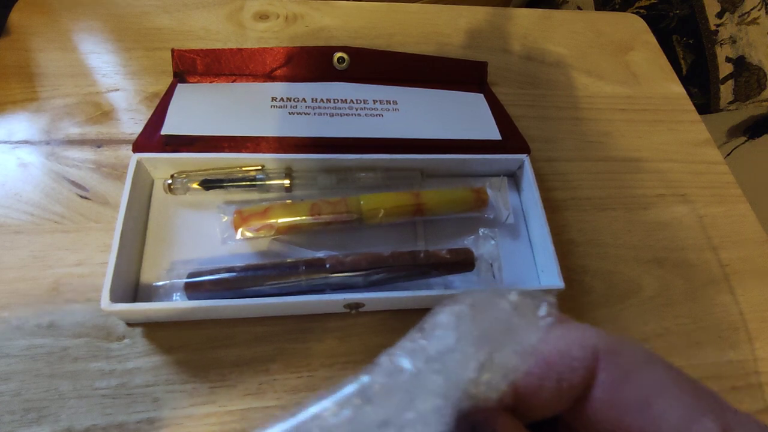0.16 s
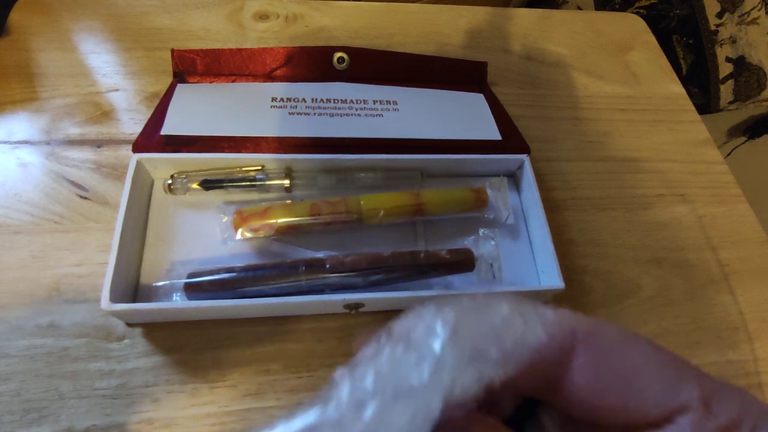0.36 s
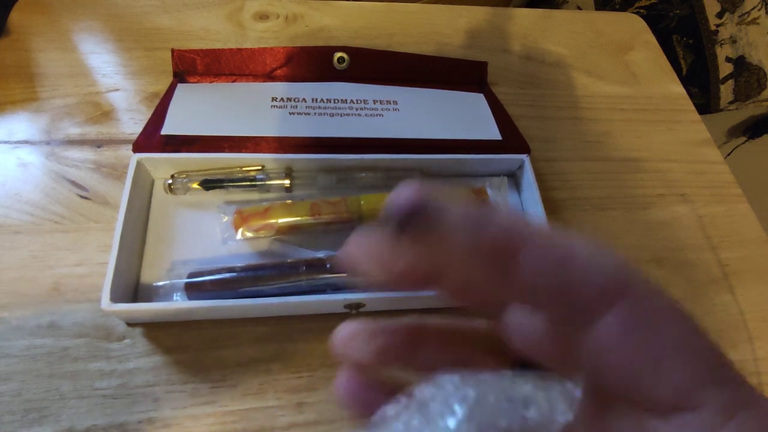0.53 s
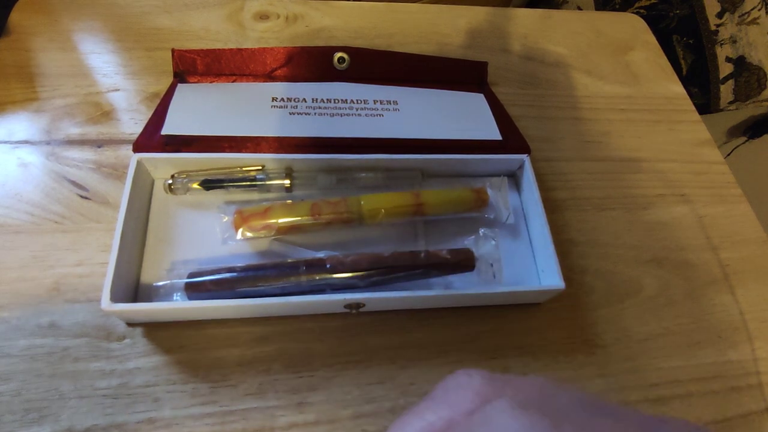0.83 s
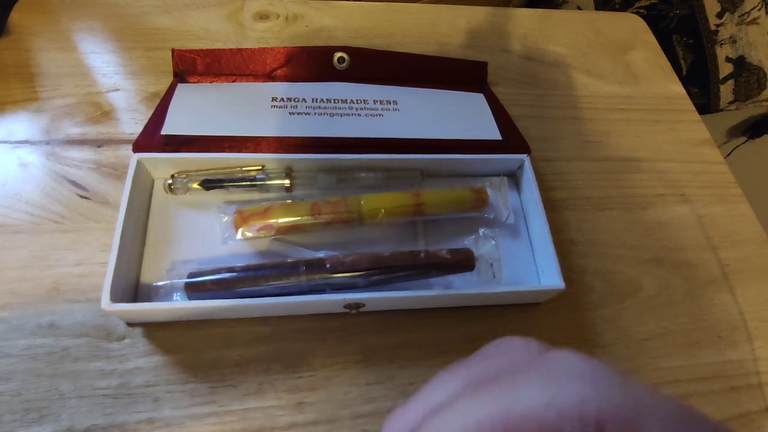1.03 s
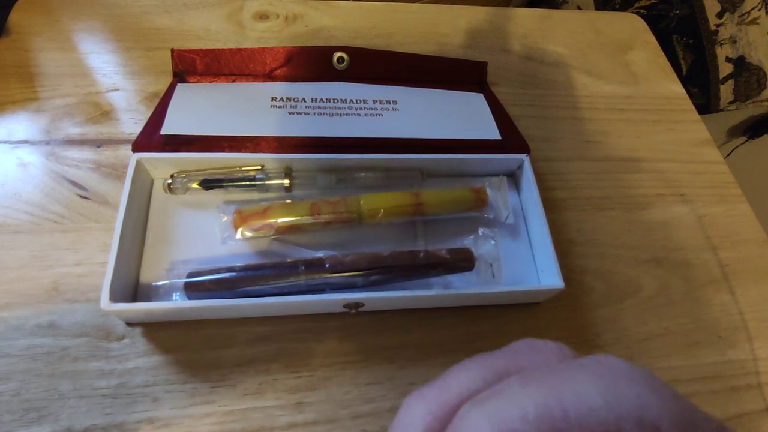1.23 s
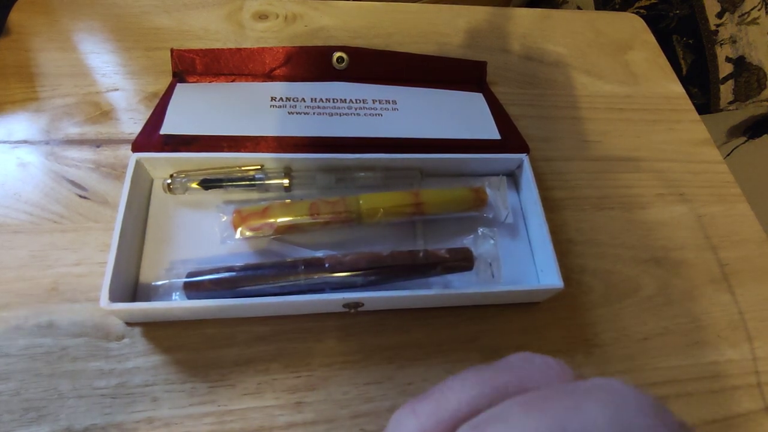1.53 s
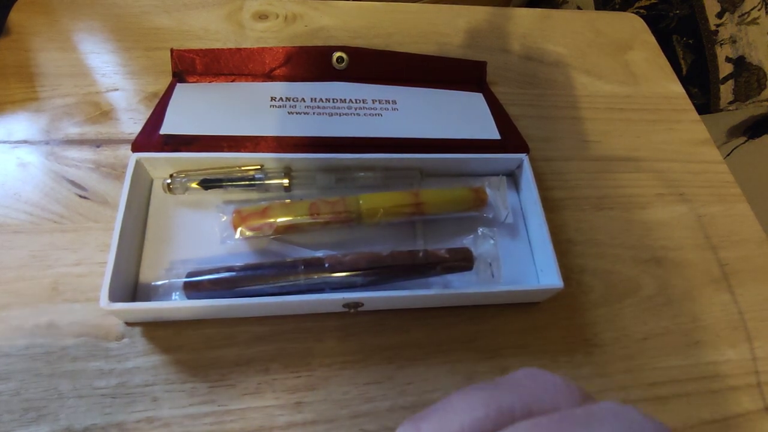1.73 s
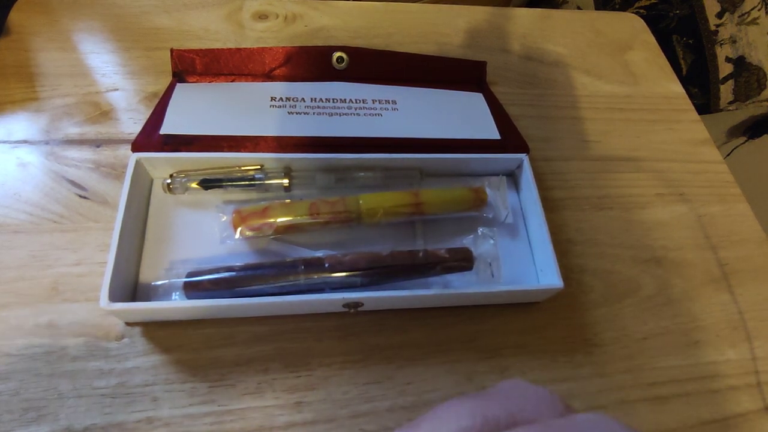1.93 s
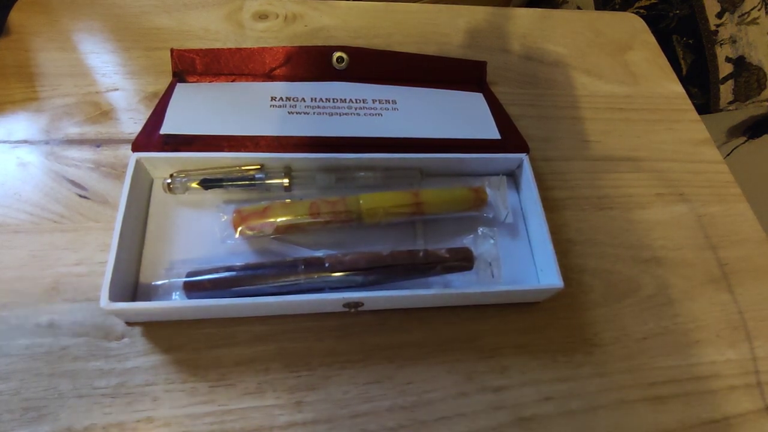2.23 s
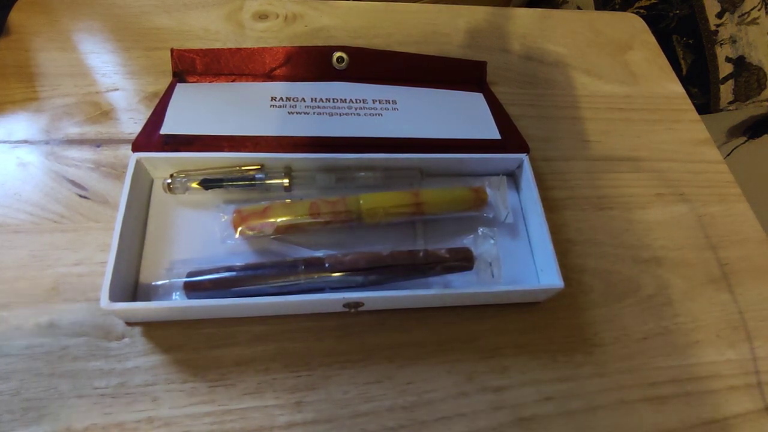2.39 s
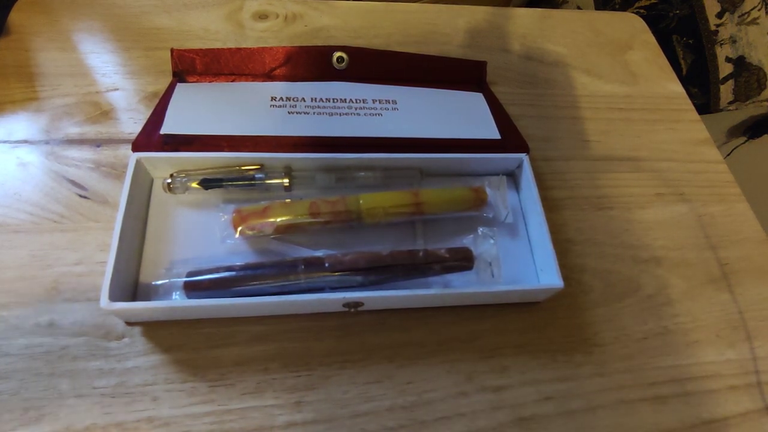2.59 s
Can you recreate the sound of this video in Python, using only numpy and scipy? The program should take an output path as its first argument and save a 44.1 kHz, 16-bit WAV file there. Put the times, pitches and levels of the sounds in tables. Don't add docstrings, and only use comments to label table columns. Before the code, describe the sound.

Bubble wrap is crinkled by hand close to a small microphone: two quick pops at the start, sparse crackles, then denser bursts of sharp snaps, easing off at the end in a quiet room.

```python
import sys
import numpy as np
from scipy import signal
from scipy.fft import rfft, irfft
from scipy.io import wavfile
from scipy.ndimage import uniform_filter1d

SR = 44100
rng = np.random.default_rng(int(sys.argv[2]) if len(sys.argv) > 2 else 0)


def convert_level_to_amplitude(level_db):
    exponent = np.asarray(level_db, float) / 20
    return 10 ** exponent


def master_out(mix):
    frames = np.transpose(np.atleast_2d(mix))
    ceiling = np.clip(frames, -1, 1)
    pcm = np.round(ceiling * 32767).astype(np.int16)
    wavfile.write(sys.argv[1], SR, pcm)


N = 121275

# frequency in Hz, level in dB per Hz.
FLOOR_SPECTRUM = [(20, -1.5), (45, -25), (90, -12), (170, -35), (215, -15), (300, -35.5), (2000, -60),
                  (7000, -33), (16000, -54)]
# time in seconds, level in dB.
AIR_PUSHES = [(0, -40.5), (.19, -37), (.27, -30.5), (.5, -24), (.62, -41), (1.55, -32.5), (1.68, -25),
              (1.95, -41.5), (2.2, -26.5), (2.4, -22), (2.62, -44.5), (2.75, -33.5)]
# centre in Hz, width in Hz, gain in dB.
COLOUR_PEAKS = [(2170, 400, -6), (7500, 4000, 3), (8500, 490, -1.5), (9620, 1700, 5.5),
                (16000, 7000, -10.5)]
# time in seconds, crackle in dB, body of the rustle in dB re crackle.
KNEADING_LEVELS = [(0, -47.5, -6), (.34, -50, -4.5), (.44, -43.5, -10), (.65, -47.5, -3.5),
                   (.69, -35.5, -9.5), (.86, -41.5, -6), (1.1, -34, -9.5), (1.3, -38, -7),
                   (1.46, -46, -8.5), (1.62, -37, -4.5), (1.8, -57.5, -6.5), (1.92, -45.5, 1),
                   (2.14, -49, -11), (2.19, -36, -12), (2.31, -37.5, -11.5), (2.37, -52.5, -6.5),
                   (2.56, -40, -12), (2.7, -48.5, -8.5)]
# start in seconds, peak in dB, pitch in Hz.
CREASES = [(0.1116, -29, 1000), (0.143, -17, 6200), (0.2683, -33, 2650), (0.2812, -30.5, 2980),
           (0.3817, -35.0, 7000), (0.3893, -29, 11200), (0.4322, -21, 6100), (0.4426, -19.5, 11400),
           (0.5022, -30, 11600), (0.51, -26, 11900), (0.6035, -26, 5750), (0.9536, -27, 6900),
           (1.032, -28.0, 6300), (1.0966, -27.0, 3500), (1.1131, -30, 3970), (1.142, -27.0, 3800),
           (1.212, -23, 6700), (1.2242, -19, 6800), (1.265, -37, 1280), (1.3119, -26, 6900),
           (1.3175, -26.0, 7500), (1.3672, -25, 11400), (1.3763, -24.5, 7400), (1.424, -22, 9900),
           (1.468, -26, 7200), (1.4971, -29, 7100), (1.5006, -30, 9800), (1.5045, -22, 6660),
           (1.528, -29.0, 10000), (1.599, -26, 3900), (1.6021, -22, 3800), (1.6637, -25, 4120),
           (1.6782, -25, 3930), (1.6873, -28, 7000), (1.7132, -30, 6400), (1.7275, -24, 3800),
           (1.7749, -35, 7300), (1.7779, -33, 14200), (1.814, -30.5, 6600), (1.8986, -23, 7500),
           (1.9799, -25, 7000), (1.9926, -21, 6800), (2.0298, -33.0, 7000), (2.067, -48, 6700),
           (2.1058, -19, 7700), (2.1412, -31, 7300), (2.1652, -27, 6400), (2.1888, -24, 7200),
           (2.2, -26, 3720), (2.2187, -19, 5500), (2.2477, -27.0, 7000), (2.2754, -27, 6160),
           (2.2797, -31, 7100), (2.3514, -32, 7360), (2.4124, -46, 5800), (2.4643, -30, 7600),
           (2.5065, -29.0, 3270), (2.6392, -28, 8500), (2.682, -27, 6900), (2.713, -28, 6600)]
# start in seconds, peak in dB, pitch in Hz.
RINGING_POCKETS = [(0.1331, -8.5, 3060), (1.063, -1, 5400), (1.0738, -19, 2950), (1.4305, -20, 3220),
                   (1.5586, -6, 4670), (1.6275, -11, 3360), (1.735, -12, 5430), (1.9075, -7, 4000),
                   (1.948, -11, 3940), (1.9983, -19, 3400), (2.0777, -4, 3900), (2.5735, -21, 4910)]
# start in seconds, treble in dB, middle in dB re treble,
# body in dB re treble, T60 in seconds.
BURST_RINGS = [
    (0.1087, -41, 5, 10.5, 0.19),
    (0.137, -36, 5, 3, 0.15),
]
# start in seconds, treble in dB, then ring, middle and
# body, each in dB re treble.
FILM_SNAPS = [(0.0021, -32.5, -1, 8.5, -6), (0.106, -24.5, 2, -5, 6.5), (0.116, -38, -6, -11, 5),
              (0.1341, -18, 1.5, 1.5, -5.5), (0.2567, -35.5, 3, -6.5, -12), (0.3219, -43, -7, -7, -21),
              (0.3509, -57.5, 2, 13.5, 13), (0.4114, -47.5, 4, 10, 1), (0.4387, -36, 7, 3.5, -7.5),
              (0.459, -45.5, 7, -2, -15), (0.5998, -39.5, 8, 4.5, -8), (0.686, -39.5, 3, 5.5, -1),
              (0.716, -47, 0, 10.5, 4.5), (0.732, -45, 5, 0, -1), (0.852, -36.5, -16, -10, -12),
              (0.9674, -37, -2, -8, -14), (1.0283, -40, 8.5, 0, -4), (1.0524, -34.5, 3, -2, -7),
              (1.0649, -36, 10.5, 7.5, -12), (1.0739, -40, -12, 16.5, 2), (1.0741, -43.5, -10, 14.5, -8),
              (1.0861, -36, 2, 5, -5), (1.152, -41, 6.5, 9, 3.5), (1.1983, -28.5, -0.5, -1.5, -12.5),
              (1.2047, -34, 4, 3, 3.5), (1.2171, -32, 4, -0.5, -9), (1.2456, -42, 8.5, 6, -5),
                (1.2846, -40, 3, 2, 6.5), (1.2962, -29.5, 1, -0.5, -4), (1.306, -32.5, 2, -2.5, -9),
                (1.412, -37.5, 2, -6, -12), (1.432, -26, -6, -4.5, -21.5), (1.476, -37.5, 2.5, 5.5, -7.5),
                (1.5442, -19.5, -3.5, -9, -13), (1.559, -27.5, 4.5, -1.5, -3.5),
                (1.5725, -24, -20, -8, -16), (1.5926, -32.5, 1, 1, -25), (1.621, -27, -2, -2, -10.5),
                (1.6215, -25.5, 3.5, -9.5, -17), (1.626, -40.5, 4, 12.5, 5), (1.6293, -28, 2, -0.5, -13),
                (1.6392, -21, -1, -4.5, -12), (1.651, -22, 2, -3, -49), (1.7088, -47.5, 8, 12, 6.5),
                (1.7361, -26, -1.5, 1, -7), (1.8608, -40, 1, -2, -9.5), (1.8685, -46, 12, 6, -3),
                (1.8775, -23, -4, -12, -16),
              (1.8808, -21, -0.5, -4, -14.5), (1.9087, -21.5, -1.5, -10, -13.5), (1.92, -29, 1, -1, -6.5),
              (1.9275, -27, -1, -4, -13), (1.9473, -20, -1, 0.5, -8), (1.9986, -22, -4, -5.5, -14),
              (2.039, -42, -2, 2, -3), (2.075, -32.5, 0, -2, -8), (2.0809, -22.5, -0.5, -1.5, -11.5),
              (2.1, -38, -1, -19, -12), (2.1737, -45, 4, 6, -12), (2.179, -39, 0, 7, -0.5),
              (2.1958, -41.5, 5, 3, -6), (2.2071, -38.5, 8, -1, -24), (2.2321, -49, 12, 5, -14),
              (2.3026, -44, 8, 7, -5), (2.316, -39, 5, 1.5, -17), (2.472, -47.5, 5.5, 6.5, 0),
              (2.5033, -42.5, 9.5, 9, 1.5), (2.554, -34.5, 1, 1, -13), (2.574, -45.5, 0, 15.5, 6.5),
              (2.5828, -39.5, 0, 8.5, -1)]

BODY_HZ, MIDDLE_HZ, RING_HZ, TREBLE_HZ = (352, 1833), (2620, 5720), (6120, 7910), (8320, 16800)
FLOOR_DB, HUM_DB, HUM_HZ, HUM_WIDTH_HZ = -47, -51, 54, 4
PUSH_HZ = (2.5, 13)
GRAINS_PER_S, GRAIN_SPREAD_DB, GRAIN_CYCLES = 2200, 4.6, 6.0
CLUMP_DB, PATCH_DB, SMOOTH_RUSTLE_DB = 3.2, 1.3, -4.5
RING_CRACKLE_DB, MIDDLE_CRACKLE_DB = -1.2, -0.62
RUMBLE_DB, RUMBLE_HZ = -2.5, (95.5, 395)
CREASE_DB, POCKET_DB, SPIT_DB = 3, -8, -4.5
CREASE_CYCLES, SPIT_DECAY_S = 3.4, 0.00055
SHAKE_DB, SHAKE_T60_S = -15, 0.04
ROOM_DB, ROOM_T60_S = -14.5, 0.16
SNAP_DB, SNAP_DECAY_S, BODY_DECAY_S = -2.7, 0.0005, 0.0006
MAIN_CRACK, FORE_CRACK_DB, FORE_CRACK_S = 7.0, -15, 0.0017


def rms_one(x):
    return x / np.sqrt(np.mean(x ** 2, axis=-1, keepdims=True) + 1e-20)


def in_time(rows):
    s, *columns = np.transpose(rows)
    t = np.arange(N) / SR
    return [np.interp(t, s, column) for column in columns]


def band(x, hz, order=2):
    return signal.sosfilt(signal.butter(order, hz, "band", fs=SR, output="sos"), x + 1e-18)


def drift(rate_hz):
    r = np.exp(-2 * np.pi * rate_hz / SR)
    wander = signal.lfilter([1], [1, -2 * r, r * r], rng.standard_normal(N + SR))
    return rms_one(wander[SR:])


def colour(x):
    for hz, width, db in COLOUR_PEAKS:
        a, w = convert_level_to_amplitude(db / 2.), 2 * np.pi * hz / SR
        k = np.sin(w) * width / hz / 2
        x = signal.lfilter([1 + k * a, -2 * np.cos(w), 1 - k * a],
                           [1 + k / a, -2 * np.cos(w), 1 - k / a], x)
    return x


def room_floor():
    hz = np.arange(N // 2 + 1) * SR / N + 1
    at, db = np.transpose(FLOOR_SPECTRUM)
    curve = convert_level_to_amplitude(np.interp(np.log(hz), np.log(at), db))
    hiss = irfft(rfft(rng.standard_normal(N)) * curve, N)
    hum_range = (HUM_HZ - HUM_WIDTH_HZ / 2, HUM_HZ + HUM_WIDTH_HZ / 2)
    hum = band(rng.standard_normal(N + SR), hum_range, order=1)[SR:]
    push = band(rng.standard_normal(N + SR), PUSH_HZ, order=3)[SR:]
    push = push / np.sqrt(uniform_filter1d(push ** 2, size=12000) + 1e-9)
    push_db = in_time(AIR_PUSHES)[0]
    return convert_level_to_amplitude(FLOOR_DB) * rms_one(hiss) + convert_level_to_amplitude(HUM_DB) * rms_one(hum) + convert_level_to_amplitude(push_db) * push


def crease_grains(clump_db):
    born = rng.random(N) < GRAINS_PER_S * convert_level_to_amplitude(clump_db) / SR
    spread = convert_level_to_amplitude(GRAIN_SPREAD_DB * np.minimum(rng.exponential(1, N), 2.9))
    sizes = born * spread * rng.choice([-1, 1], N)
    pitch = rng.integers(0, 16, N)
    grains = 0.2 * sizes
    for k, hz in enumerate(np.geomspace(900, 14000, num=16)):
        r, w = convert_level_to_amplitude(-60 * hz / (GRAIN_CYCLES * SR)), 2 * np.pi * hz / SR
        ring = signal.lfilter([1 - r * r, 0, r * r - 1], [1, -2 * r * np.cos(w), r * r],
                              sizes * (pitch == k))
        grains = grains + ring
    return rms_one(grains)


def crackle():
    db, body_db = in_time(KNEADING_LEVELS)
    clump_db = CLUMP_DB * (0.7 * drift(45) + 0.35 * drift(12))
    rub = convert_level_to_amplitude(SMOOTH_RUSTLE_DB + 0.3 * clump_db) * rng.standard_normal(N)
    film = crease_grains(clump_db) + rub

    def patchy(hz):
        return convert_level_to_amplitude(PATCH_DB * drift(3.3) - 2.5) * rms_one(colour(band(film, hz)))

    rumble = rms_one(band(rng.standard_normal(N), RUMBLE_HZ))
    rumble = convert_level_to_amplitude(RUMBLE_DB + 2.25 * drift(9.6)) * rumble
    bed = patchy(TREBLE_HZ)
    bed = bed + convert_level_to_amplitude(RING_CRACKLE_DB) * patchy(RING_HZ)
    bed = bed + convert_level_to_amplitude(MIDDLE_CRACKLE_DB) * patchy(MIDDLE_HZ)
    bed = bed + convert_level_to_amplitude(body_db) * (patchy(BODY_HZ) + rumble)
    return convert_level_to_amplitude(db) * bed


def creases_and_pockets():
    pockets = [(s + 0.001, db + POCKET_DB, hz) for s, db, hz in RINGING_POCKETS]
    s, db, hz = np.transpose(np.vstack([CREASES, pockets]))[:, :, None]
    t = np.arange(300) / SR
    spit = rng.standard_normal((len(s), 300)) * np.exp(-t / SPIT_DECAY_S)
    spit = colour(band(spit, (MIDDLE_HZ[0], 13000)))
    ring = np.sin(2 * np.pi * hz * t) * np.exp(-t * hz / CREASE_CYCLES) * (1 - np.exp(-t * hz))
    sound = convert_level_to_amplitude(db + CREASE_DB) * (ring + convert_level_to_amplitude(SPIT_DB) * spit)
    out = np.zeros(N + 300)
    np.add.at(out, (s * SR).astype(int) + np.arange(300), sound)
    return out[:N]


def burst_tails():
    out, t = 0, np.arange(N) / SR
    for s, db, middle_db, body_db, t60 in BURST_RINGS:
        onset = np.clip((t - s) / 0.002, 0, 1)
        fade = convert_level_to_amplitude(db - 60 * np.abs(t - s) / t60) * onset
        for hz, share_db in ((TREBLE_HZ, 0), (RING_HZ, -3), (MIDDLE_HZ, middle_db), (BODY_HZ, body_db)):
            noise = rms_one(colour(band(rng.standard_normal(N), hz)))
            out = out + fade * convert_level_to_amplitude(share_db + 0.98 * drift(210)) * noise
    return out


def after_sound(hits):
    out = 0
    for hz in (TREBLE_HZ, RING_HZ, MIDDLE_HZ, BODY_HZ):
        power = band(hits, hz) ** 2
        for db, t60 in ((SHAKE_DB, SHAKE_T60_S), (ROOM_DB, ROOM_T60_S)):
            r = convert_level_to_amplitude(-120 / (t60 * SR))
            level = np.sqrt(signal.lfilter([1 - r], [1, -r], power))
            rough = rng.standard_normal(N) * convert_level_to_amplitude(4.5 * drift(450))
            late = np.roll(level, 50)
            out = out + convert_level_to_amplitude(db) * late * rms_one(colour(band(rough, hz)))
    return out


def snaps():
    rows = np.array(FILM_SNAPS)
    s, db, ring_db, middle_db, body_db = np.transpose(rows)
    count = len(s)
    t = np.arange(-200, 400) / SR
    cracks = rng.standard_normal((count, 600)) * convert_level_to_amplitude(4.6 * rng.standard_normal((count, 600)))
    cracks[:, 203] = MAIN_CRACK * rng.choice([-1, 1], count)
    since_fore = t + FORE_CRACK_S * convert_level_to_amplitude(2.5 * rng.standard_normal((count, 1)))
    fore = convert_level_to_amplitude(FORE_CRACK_DB + 6.4 * rng.standard_normal((count, 1)))
    fore = fore * (s > BURST_RINGS[-1][0])[:, None]
    burst = 0
    for hz, share_db in ((TREBLE_HZ, 0), (RING_HZ, ring_db), (MIDDLE_HZ, middle_db), (BODY_HZ, body_db)):
        decay = BODY_DECAY_S if hz == BODY_HZ else SNAP_DECAY_S
        main_shape = (t >= 0) * np.exp(-t / decay)
        fore_shape = (since_fore >= 0) * np.exp(-np.abs(since_fore) / decay)
        sound = rms_one(colour(band(cracks * (main_shape + fore * fore_shape), hz)))
        burst = burst + sound * convert_level_to_amplitude(db + share_db + SNAP_DB)[:, None]
    out = np.zeros(N + 600)
    np.add.at(out, (s * SR).astype(int)[:, None] + np.arange(600), burst)
    return out[205:N + 205]


def scene():
    hits = snaps()
    background = room_floor() + crackle()
    details = creases_and_pockets() + burst_tails()
    return (background + details + after_sound(hits) + hits)[None]


def low_pass(x):
    return signal.sosfilt(signal.butter(12, 16690, fs=SR, output="sos"), x)


def record(dry):
    top_cut = signal.cheby1(8, 0.5, 15850, fs=SR, output="sos")
    mix = np.clip(signal.sosfilt(top_cut, dry), -1, 1)
    return low_pass(mix)


dry = scene()
out = record(dry)
master_out(out)
```